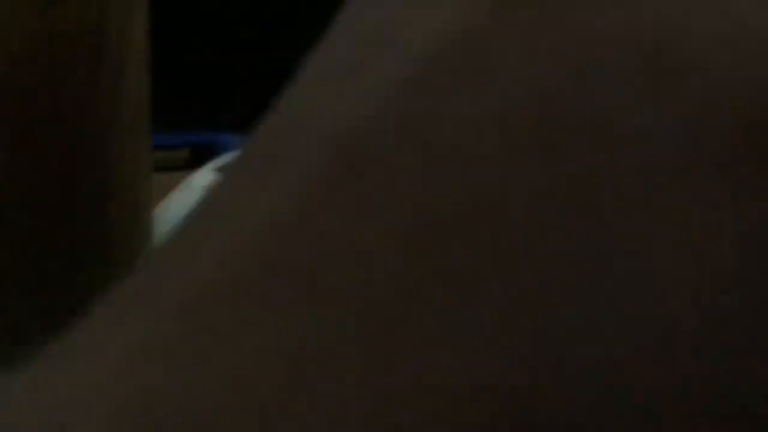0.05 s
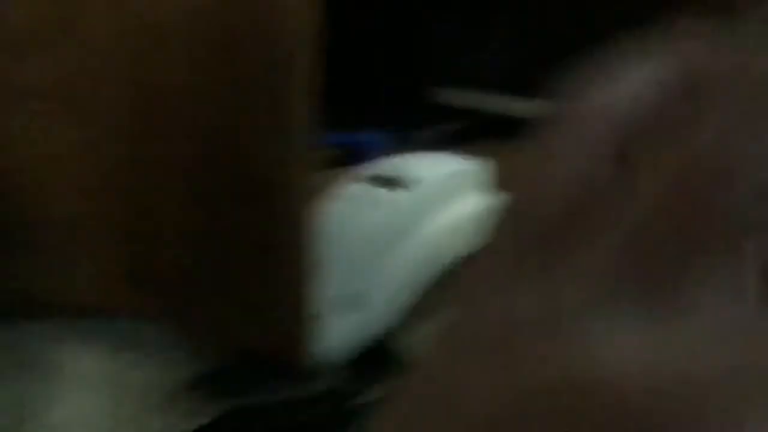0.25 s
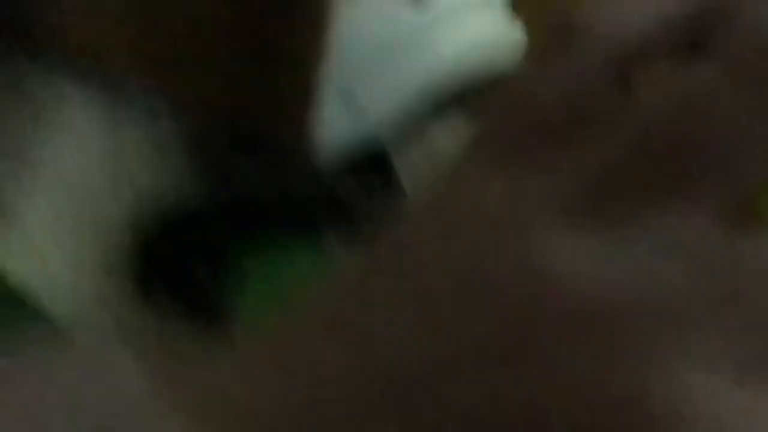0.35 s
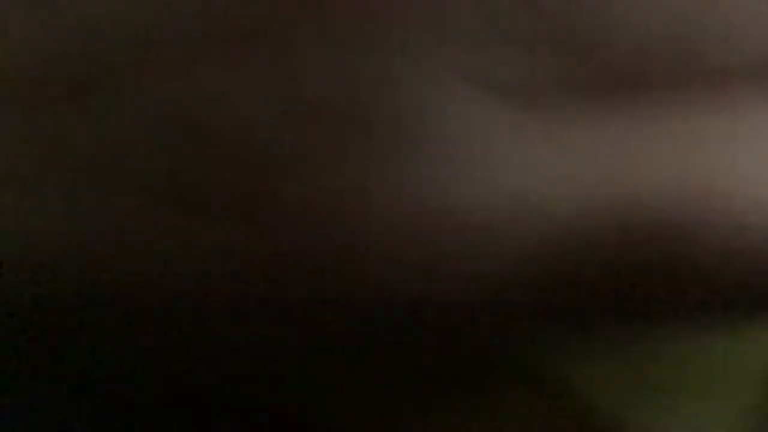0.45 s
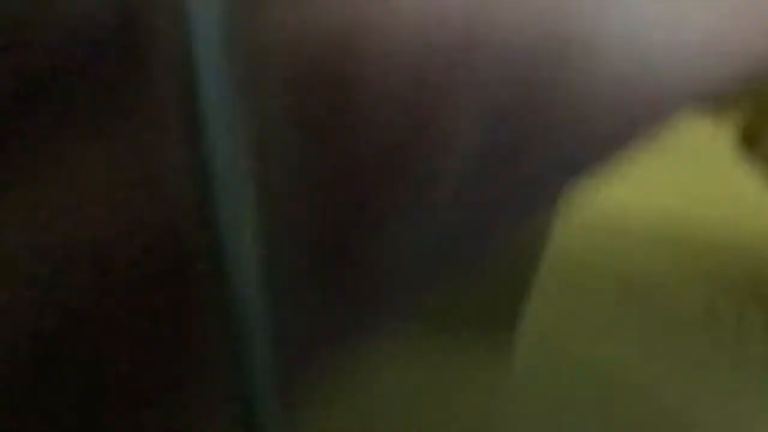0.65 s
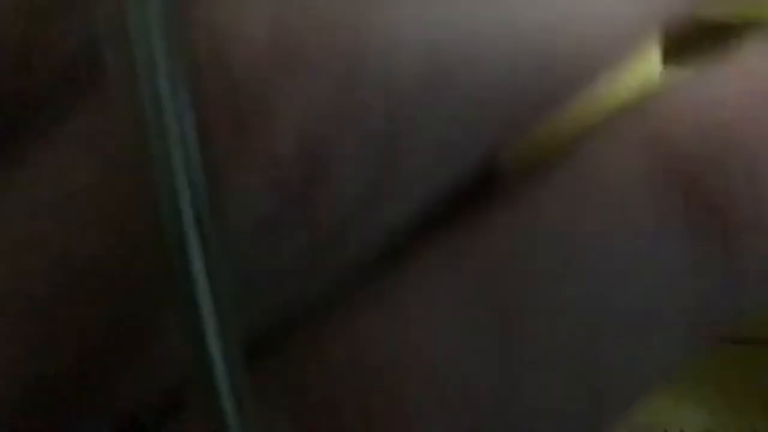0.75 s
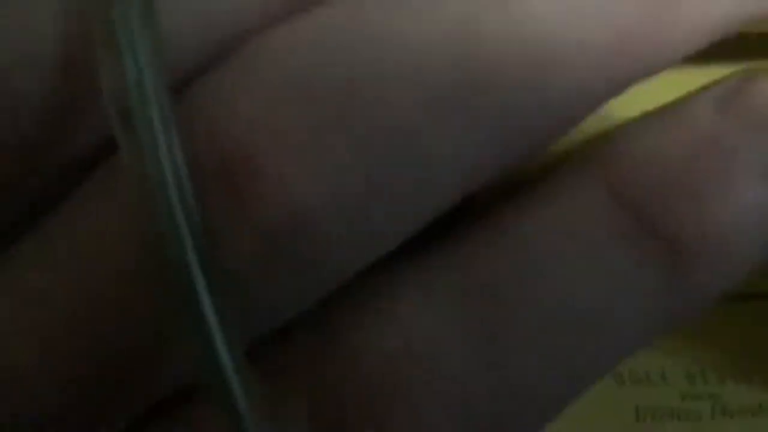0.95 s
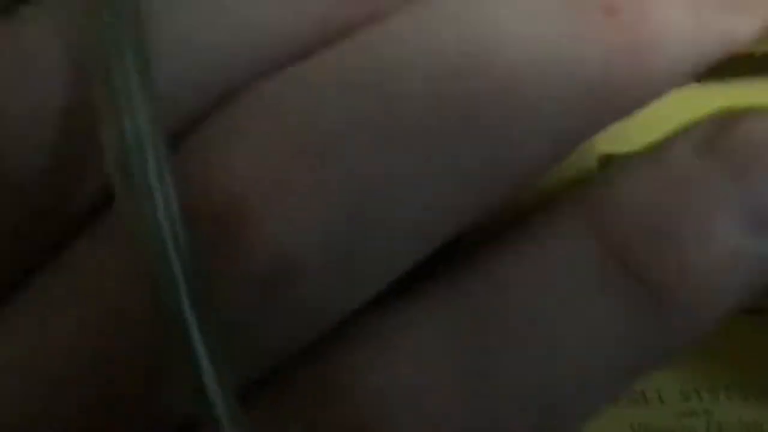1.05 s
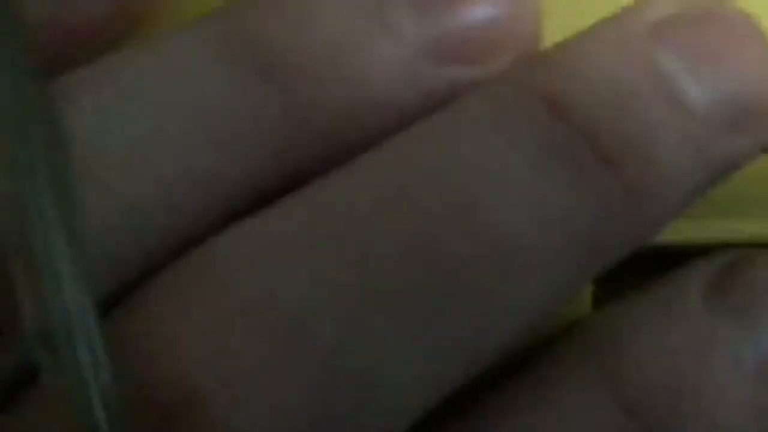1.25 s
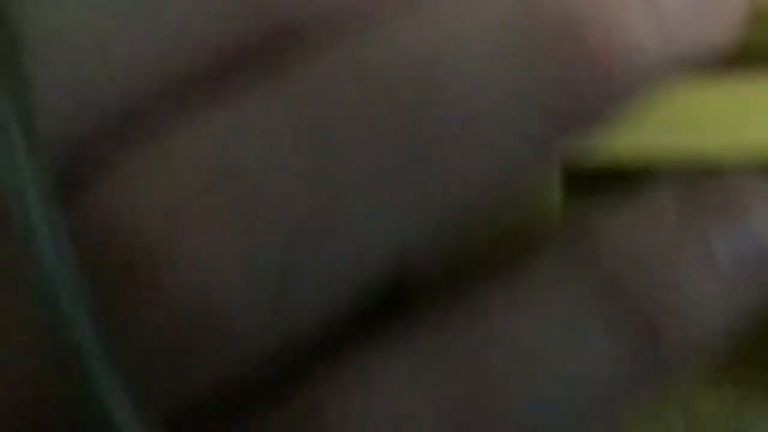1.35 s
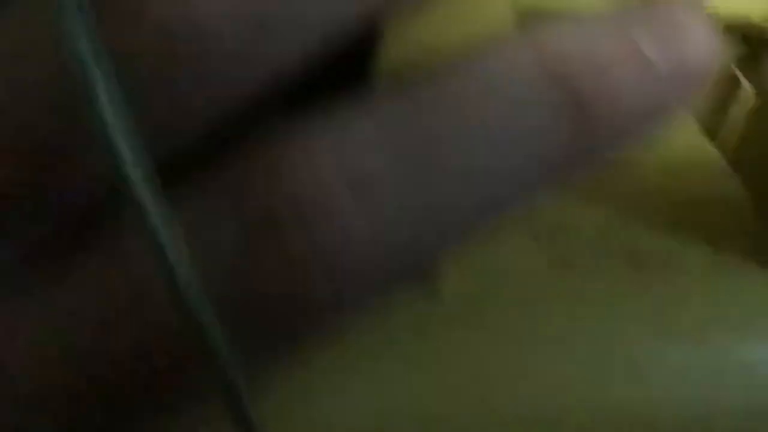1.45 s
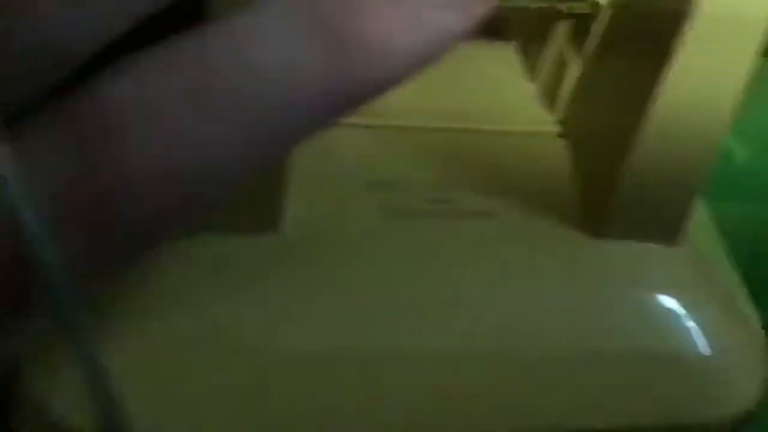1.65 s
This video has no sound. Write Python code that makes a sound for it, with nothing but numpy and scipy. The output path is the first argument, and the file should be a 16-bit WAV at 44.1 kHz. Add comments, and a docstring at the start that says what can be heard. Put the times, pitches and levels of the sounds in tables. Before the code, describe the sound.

Hollow knocks come from a plastic telephone casing handled very near the microphone, first in a quick cluster with skin rubbing. Two sharp snaps ring briefly in the small room between further knocks, and a faint finger brush ends it.

```python
"""In a small quiet room, a hand turns a plastic telephone housing over, very close by.
Knocks travel through the casing, treble first, so each is a short falling chirp with a low thud.
Twice the plastic catches and lets out a sharp snap that rings into the room.
The shell ticks, skin rubs on it before the hardest knock, and the fingers slide off at the end."""
import sys
import numpy as np
from scipy import signal
from scipy.fft import rfft, irfft
from scipy.io import wavfile

SR = 44100
rng = np.random.default_rng(int(sys.argv[2]) if len(sys.argv) > 2 else 0)


def persist_wave(psi):
    """Save psi, clipped to +-1, as 16-bit WAV."""
    counts = np.round(np.clip(psi, -1, 1) * 32767).astype(np.int16)
    wavfile.write(sys.argv[1], SR, np.atleast_2d(counts).T)


N = 74970  # 1.7 seconds

# The knocks. Each row: start in seconds, level in dB, pitch in Hz above which it dulls, dulling in
# dB per octave, bass cut in Hz, ringing pitch in Hz, ring boost in dB, bass delay in seconds.
KNOCKS = [(0.0428, 1, 470, 3, 43, 680, 11, 0.027), (0.1228, 29.5, 250, 8, 3160, 910, 1.5, 0.024),
          (.1595, 14.5, 240, 5, 17, 395, 1.5, 0.031), (0.2288, 21.5, 5720, 17.5, 670, 1870, 4.5, 0.013),
          (0.2379, 31, 610, 7, 23, 920, 3.5, .023), (0.3075, 11, 290, 8, 20, 1380, 11, .024),
          (.363, -6, 332, 5.5, 20, 500, 10, .026), (0.6837, -11, 845, 6.5, 20, 420, 12.5, .026),
          (0.7021, 5.5, 611, 9, 270, 1050, 7.5, .036), (0.7272, 8.5, 380, 10, 130, 1340, 12.5, .02),
          (0.7366, 8.5, 231, 5, 160, 1090, 12.5, .024), (0.9716, 11.5, 243, 6, 20, 2470, 1.5, 0.0267),
          (1.251, 14.5, 1850, 13.5, 45, 2340, 3, 0.026), (1.3135, 20.5, 407, 13, 110, 770, 15, 0.019)]
# The snaps. Each row: start in seconds, level in dB, gap to the second catch in seconds,
# how much louder that catch is in dB, level of the hollow ring in dB.
SNAPS = [(0.51, 2, .0014, 1, -17.5), (1.0759, 3.5, 0.000718, 2, -23.5)]
# The ticks. Each row: start in seconds, level in dB, middle pitch in Hz, reach each way in octaves.
TICKS = [(0.0355, -54.5, 5700, 0.38), (.0415, -22.5, 1030, .6), (0.2262, -31, 5900, 0.7),
         (.2615, -25, 900, .6), (0.3274, -57, 11000, 0.45), (.7025, -63, 10000, .6),
         (0.735, -59.5, 10000, 0.65), (1.0304, -40, 1860, 0.29)]

# Ringing notes. Each row: pitch in Hz, level in dB, seconds to fade by 60 dB (called t60).
CAVITY_NOTES = [(130, -4, 0.16), (207.3, -10, 0.049), (253, -10, 0.13), (621.4, -14, .12)]  # low ring after every knock
SHELL_NOTES = [(1098, -42, 0.07), (1680, -42.5, 0.065), (2810, -48, 0.012), (3490, -42.5, 0.028),
               (4074, -42, 0.042), (4380, -44.5, 0.026), (6316, -36, 0.02), (8670, -41, .013),
               (9200, -27.5, 0.012), (11270, -39.5, 0.014), (14670, -53, 0.0147)]  # bright ring of snapping plastic

# Tone colours: which pitches are strong. Each row: pitch in Hz, relative strength in dB.
CASING_COLOUR = [(40, -27.5), (70, -1.5), (130, -0.5), (180, -3.5), (250, -2.5), (430, -2), (620, 1.5),
                 (1000, -3), (1400, -1), (2100, -4.5), (2800, -19.5), (3600, -4.5), (5200, -20.5),
                 (6300, -23), (7500, -29.5), (14000, -43)]
CRACK_COLOUR = [(300, -20.5), (1000, -6.5), (2200, -1.5), (4200, 3), (6300, -3), (7100, -15.5), (8000, 1.5),
                (9100, 4), (10200, -7.5), (14500, -7.5), (16000, -17)]
HOLLOW_COLOUR = [(60, -10), (130, -5.5), (220, 11), (330, 0.5), (480, -3.5), (630, 3), (850, -21),
                 (1100, -8), (2000, -19), (3000, -28), (8000, -37.5)]
GRIP_COLOUR = [(20, -23), (45, -8.5), (75, 1.5), (130, 2), (250, -0.5), (450, -15), (1000, -34),
               (4000, -70.5)]
RUB_COLOUR = [(60, 12), (150, -3), (600, -1), (1000, -3), (2100, -9), (3000, -13.5), (3900, -11.5),
              (5000, -29.5), (6300, -21), (7300, -34.5), (9000, -26.5), (11000, -32), (16000, -30)]
BRUSH_COLOUR = [(150, -23), (450, 1.5), (900, 2), (1400, -4.5), (2800, -14.5), (4300, -14.5), (5200, -25.5),
                (16000, -43)]
HISS_COLOUR = [(2000, -28.5), (6200, -3), (7500, -14), (8700, -3.5), (10000, -8.5), (11400, 4), (15600, -2),
               (16200, -25.5)]
ROOM_TONE_COLOUR = [(25, -15), (45, -7), (85, -28.5), (122, 7.5), (160, -4.5), (205, 7), (310, -12.5),
                    (450, 1.5), (530, -10.5), (615, 4), (720, -7.5), (950, -10.5), (1500, -17.5),
                    (2600, -23.5), (3700, -17.5), (5200, -33.5), (6300, -28), (7400, -41.5), (8800, -31),
                    (10200, -40.5), (15400, -34.5), (16200, -60)]

# How loud the hand is as it moves. Each row: time in seconds, level in dB.
GRIP_LEVELS = [(0, -50), (.05, -56), (0.079, -39.5), (.13, -59), (.23, -55), (.258, -28), (.29, -58),
               (.385, -56.5), (.44, -69), (0.501, -61), (.62, -63), (.85, -59), (1.18, -62), (1.225, -47),
               (1.28, -41), (1.38, -66.5), (1.55, -55.5), (1.64, -50.5), (1.7, -54)]  # low rumble of the grip
RUB_LEVELS = [(0, -94), (0.044, -39.5), (.075, -82), (0.114, -64), (0.138, -41.5), (.19, -43),
              (.225, -37.5), (0.267, -38), (.283, -40), (.3, -57), (0.341, -91)]  # skin rubbing on the shell
# Fingers sliding off. Each row: time in seconds, dull brush in dB, fine hiss in dB.
SLIDE_LEVELS = [(1.25, -77, -86), (1.3, -55.5, -69), (1.4, -52.5, -76), (1.46, -54.5, -72),
                (1.52, -62.5, -68), (1.7, -77, -77)]

# How long echoes last. Each row: pitch in Hz, seconds to fade by 60 dB.
NEAR_ECHO_FADE = [(500, 0.079), (2000, 0.091), (4500, 0.062), (9000, 0.018), (15000, 0.068)]
ROOM_ECHO_FADE = [(150, .25), (600, 0.42), (2000, 0.33), (4000, 0.25), (9000, 0.15), (15000, 0.063)]

LEAD_S = 0.002  # soft lead-in of every pulse


def knock(db, contact_hz, slope_db, low_hz, ring_hz, ring_db, lag_s):
    """A blow, dulled by its contact, spreads through the casing and rings the space inside."""
    t, hz = grid()
    contact = -slope_db / 4 * np.log2(1 + (hz / contact_hz) ** 4)
    low_cut = -10 * np.log10(1 + (low_hz / (hz + 1)) ** 2)
    ring = ring_db / (1 + ((hz - ring_hz) / (0.4 * ring_hz)) ** 2)
    delay_s = lag_s / (1 + (hz / 128) ** 1.7)  # low waves arrive late, so the pitch falls
    wave = pulse(db + read(CASING_COLOUR, hz) + contact + low_cut + ring, delay_s)
    # Scaled so that a longer note does not boost its own pitch more.
    cavity = sum(amp(level) * 2 * np.log(1000) / (t60 * SR) * fade(t, t60) * np.cos(2 * np.pi * f * t)
                 for f, level, t60 in CAVITY_NOTES)
    return wave + through(wave, cavity)


def casing():
    """The casing sounds with every knock, and rings hollow just after each snap."""
    t, hz = grid()
    out = np.zeros(N)
    for start, *blow in KNOCKS:
        add(out, start - LEAD_S, knock(*blow))
    delay_s, rise_s = 0.01, 0.0017
    for start, *_, hollow_db in SNAPS:
        shake = rng.standard_normal(len(t)) * np.minimum(t / rise_s, 1) * fade(t, t60=0.14)
        add(out, start + delay_s, coloured(shake, hollow_db + read(HOLLOW_COLOUR, hz)))
    return out


def snaps():
    """In each snap the plastic catches twice, each time with a crack and short bright notes."""
    t, hz = grid()
    out = np.zeros(N)
    crack_db, rise_s = -18, 0.0005
    for start, db, gap_s, second_db, _ in SNAPS:
        for at, level in (start, db), (start + gap_s, db + second_db):
            burst = rng.standard_normal(len(t)) * fade(t, t60=0.0077)
            crack = amp(crack_db) * coloured(burst, read(CRACK_COLOUR, hz))
            ring = sum(amp(note_db) * fade(t, t60) * np.sin(2 * np.pi * (f * t + rng.random()))
                       for f, note_db, t60 in SHELL_NOTES)
            add(out, at, amp(level) * np.minimum(t / rise_s, 1) * (crack + ring))
    return out


def ticks():
    """The shell creaks briefly: small bursts of noise, each in its own range of pitch."""
    t, hz = grid()
    out = np.zeros(N)
    for start, db, centre_hz, octaves in TICKS:
        band = -10 * np.log10(1 + (np.log2((hz + 1) / centre_hz) / octaves) ** 6)
        burst = rng.standard_normal(len(t)) * fade(t, t60=0.057)
        add(out, start, coloured(burst, db + band))
    return out


def friction(colour, levels):
    """Skin moves over plastic in thousands of tiny slips, some stronger than others."""
    slips_per_s, spread_db = 12000, 2.5
    slips = rng.standard_normal(N) * (rng.random(N) < slips_per_s / SR)
    slips *= amp(spread_db * np.minimum(rng.exponential(1, N), 3))
    level_db = np.interp(np.arange(N) / SR, *np.transpose(levels))
    return unit(coloured(slips, read(colour, grid()[1]))) * amp(level_db)


def hand():
    """The hand grips, rubs the shell as it turns, and slides off at the end."""
    times, brush_db, hiss_db = np.transpose(SLIDE_LEVELS)
    brush = friction(BRUSH_COLOUR, np.c_[times, brush_db])
    hiss = friction(HISS_COLOUR, np.c_[times, hiss_db])
    return friction(GRIP_COLOUR, GRIP_LEVELS) + friction(RUB_COLOUR, RUB_LEVELS) + brush + hiss


def echoes(fade_times, size=16384):
    """The room answers a click with a blur of echoes, each pitch fading at its own speed."""
    bounces = rng.standard_normal(size) * (np.arange(size) / SR > 0.002)  # none in the first 2 ms
    hz, frame_s, bands = signal.stft(bounces, SR, nperseg=128)
    tail = signal.istft(bands * fade(frame_s, read(fade_times, hz)[:, None]), SR)[1]
    return tail / np.linalg.norm(tail)


def room_tone():
    """The room has a faint low noise whose level wavers a little."""
    t = np.arange(N) / SR
    level_db, drift_db = -55.5, -1.96
    drift = unit(sum(np.sin(2 * np.pi * (f * t + rng.random())) / np.sqrt(f)
                     for f in np.geomspace(1, 20, 20)))
    colour = amp(read(ROOM_TONE_COLOUR, np.fft.rfftfreq(N, 1 / SR)))
    noise = irfft(rfft(rng.standard_normal(N)) * colour, N)
    return unit(noise) * amp(level_db + drift_db * drift)


def pulse(db, lag_s=0):
    """Builds a click with the tone colour db, each pitch delayed by lag_s."""
    log_gain = np.log(amp(np.maximum(db, -100)))
    # This phase makes every pitch sound as early as it can after the click starts.
    phase = -signal.hilbert(np.r_[log_gain, log_gain[-2:0:-1]]).imag[:len(db)]
    lag = lag_s * np.ones(len(db))
    t, hz = grid()
    phase -= 2 * np.pi * (np.cumsum(lag) - lag[0]) * hz[1]
    wave = np.roll(irfft(np.exp(log_gain + 1j * phase)), round(LEAD_S * SR))
    return wave * np.minimum(t / LEAD_S, 1) * np.minimum(10 * (1 - t / t[-1]), 1)  # soften both ends


def coloured(x, db):
    """Gives a sound the tone colour db."""
    return through(x, pulse(db), LEAD_S)


def through(x, response, lead_s=0):
    """Passes a sound through a ring or echo, skipping the lead-in and keeping the length."""
    return signal.fftconvolve(x, response)[round(lead_s * SR):][:len(x)]


def fade(t, t60):
    """Dies away by 60 dB every t60 seconds."""
    return np.exp(-np.log(1000) * t / t60)


def amp(db):
    """Turns decibels into a number to multiply by."""
    return 10 ** (np.asarray(db) / 20)


def unit(x):
    """Scales a sound to an average power of 1."""
    return x / np.sqrt(np.mean(x ** 2) + 1e-20)


def read(points, hz):
    """Looks up pitches in a table, blending between its rows."""
    f, value = np.transpose(points)
    return np.interp(np.log(hz + 1), np.log(f + 1), value)


def add(mix, start_s, sound):
    """Mixes a sound in at its start time."""
    part = mix[max(round(start_s * SR), 0):][:len(sound)]
    part += sound[:len(part)]


def grid(size=8192):
    """Gives the times in seconds and pitches in Hz for one short sound."""
    return np.arange(size) / SR, np.fft.rfftfreq(size, 1 / SR)


def scene():
    """Mixes everything: the close knocks barely echo, while the snaps ring into the room."""
    near, tail = echoes(NEAR_ECHO_FADE), echoes(ROOM_ECHO_FADE)
    knocks, clicks = casing(), snaps()
    near_echo = amp(-5) * through(clicks, near)
    room_echo = through(amp(-15) * clicks + amp(-42.5) * knocks, tail)
    return (knocks + clicks + near_echo + room_echo + ticks() + hand() + room_tone())[None]


def record(dry):
    """Flattens peaks that pass full scale, then cuts the treble above 16500 Hz."""
    treble_cut = signal.firwin(511, 16500, window=("kaiser", 9), fs=SR)
    return signal.oaconvolve(np.clip(dry, -1, 1), treble_cut[None], "same")


dry = scene()
out = record(dry)
persist_wave(out)
```